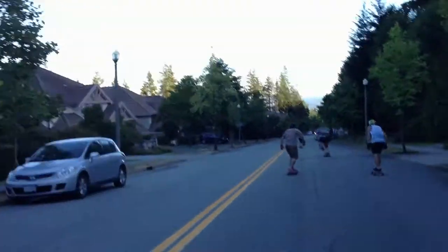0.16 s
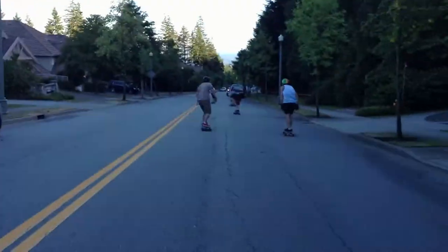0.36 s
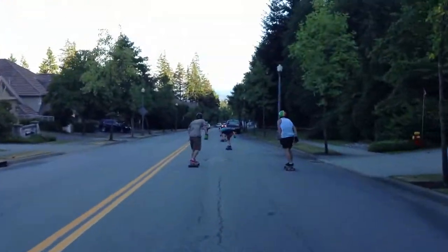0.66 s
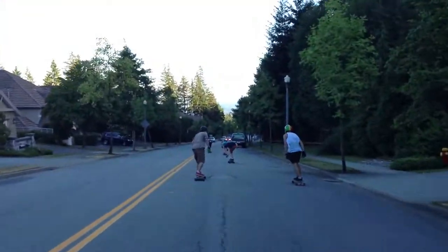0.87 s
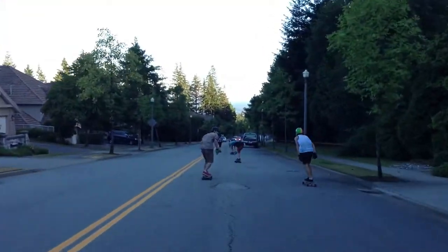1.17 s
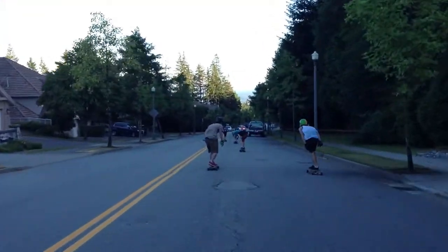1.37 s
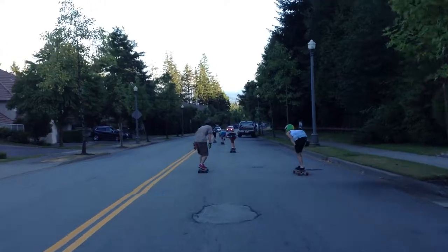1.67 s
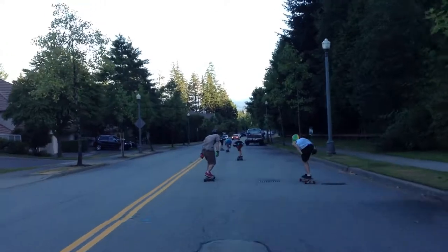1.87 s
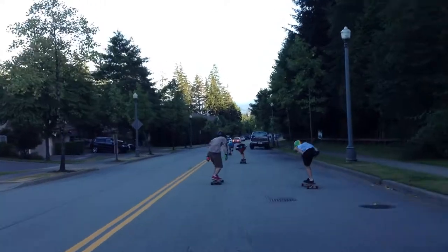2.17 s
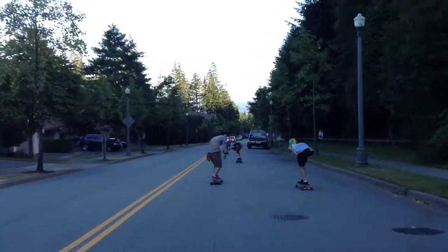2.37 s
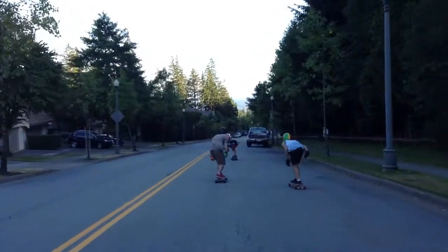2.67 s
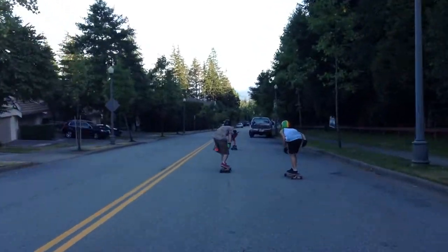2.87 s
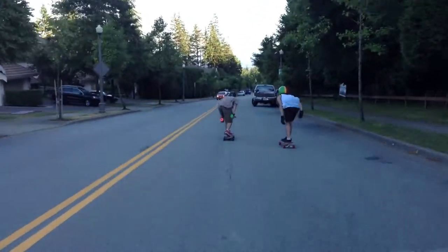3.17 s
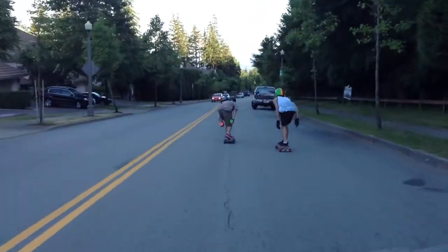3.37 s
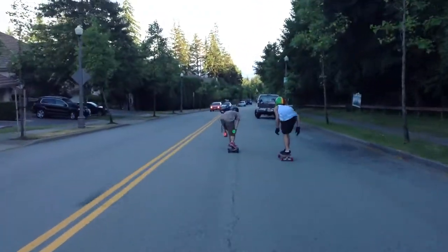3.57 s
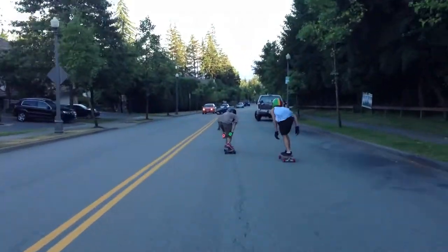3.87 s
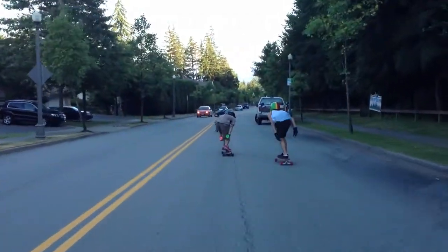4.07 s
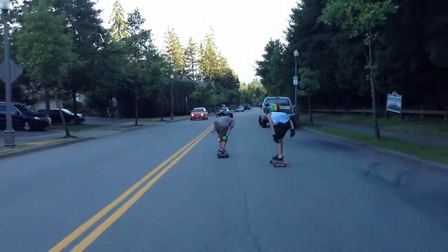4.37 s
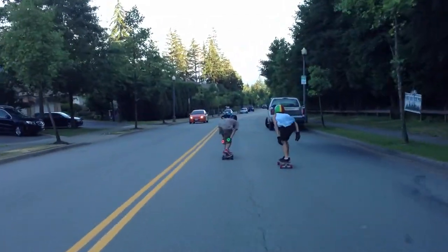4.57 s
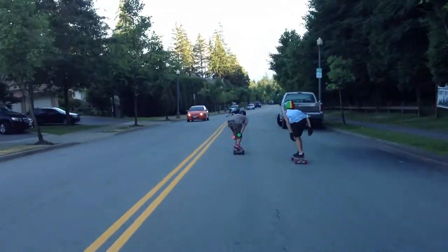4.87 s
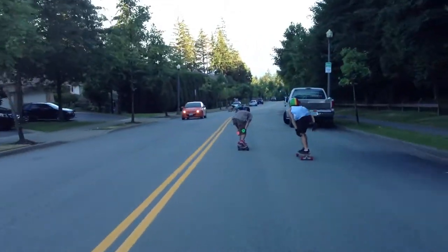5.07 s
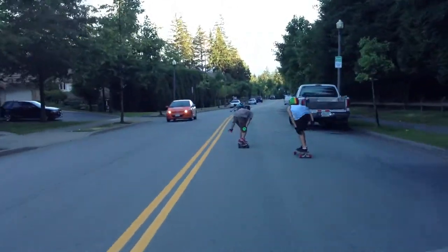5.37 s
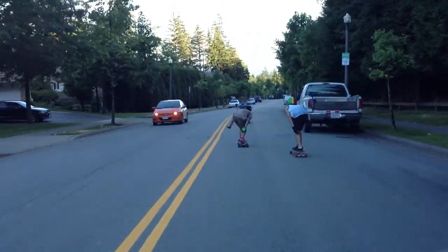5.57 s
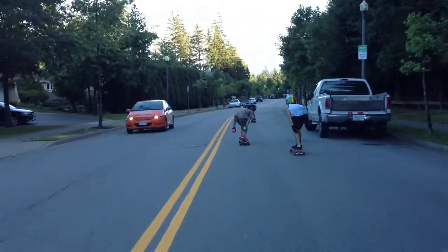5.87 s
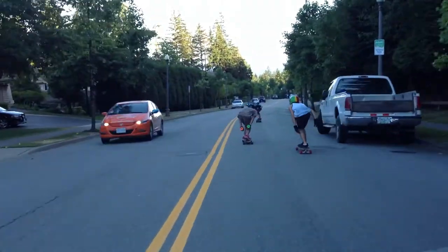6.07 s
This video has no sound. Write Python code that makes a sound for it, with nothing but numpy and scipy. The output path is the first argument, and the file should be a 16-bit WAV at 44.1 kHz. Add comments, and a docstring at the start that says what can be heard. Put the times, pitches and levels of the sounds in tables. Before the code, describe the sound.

Close, gusting wind whistles right at the microphone, its pitch warbling up and down over a low rumble and irregular thumps. The squeal is strongest in the first half, then turns into a ragged, fluttering rush with scraps of whistle. Behind it, longboards rolling down a street make a faint, even hiss on the asphalt, with a single brief wheel squeak near the start.

```python
"""Wind squealing on an edge right beside the microphone, held out in the airstream by a rider
following longboarders fast down a residential hill. The shed vortices sing with a wavering pitch
that rises in gusts, sags in lulls and breaks into a ragged rush in turbulence; eddies thump on the
capsule. Farther off, urethane wheels hiss on the asphalt and squeak once.
Mono, with the bass cut and a limiter holding the peaks down."""
import sys
import numpy as np
from scipy import signal
from scipy.fft import rfft, irfft
from scipy.io import wavfile
from scipy.ndimage import uniform_filter1d, minimum_filter1d

SR = 44100
rng = np.random.default_rng(int(sys.argv[2]) if len(sys.argv) > 2 else 0)


def inscribe(sig):
    """Save sig as 16-bit PCM at rate SR to the path in sys.argv[1].

    A 1-D sig is mono; a 2-D sig holds one channel per row.
    Samples are clipped to [-1, 1] before scaling.
    """
    pcm = np.round(np.clip(np.atleast_2d(sig).T, -1, 1) * 32767)
    wavfile.write(sys.argv[1], SR, pcm.astype(np.int16))


N = 273852
TIME = np.arange(N) / SR


def undb(db):
    """Decibels to gain."""
    return 10 ** (np.asarray(db) / 20)


def unit(x):
    """Scale to rms 1."""
    return x / np.sqrt(np.mean(x ** 2))


def curves(table):
    """Each column of a table, joined by straight lines in time."""
    times, *columns = np.transpose(table)
    return [np.interp(TIME, times, column) for column in columns]


def swells(table, skew=0):
    """Bell curves from rows of t/s, half length/s, height/dB, summed in dB; skew shortens their ends."""
    total_db = 0
    for t, half, db in table:
        width = half * (1 - skew * np.sign(TIME - t))
        total_db += db * np.exp(-np.minimum(((TIME - t) / width) ** 2, 20))
    return total_db


def flutter(slow_hz, fast_hz):
    """Random wavering between two rates, rms 1."""
    f = np.maximum(np.arange(N // 2 + 1) * SR / N, 1e-3)
    band = 1 / np.sqrt((1 + (slow_hz / f) ** 4) * (1 + (f / fast_hz) ** 6))
    return unit(irfft(rfft(rng.standard_normal(N)) * band, N))


def churn(spectrum, bursts, depth_db):
    """Noise that swells with the bursts, coloured by rows of f/Hz, level/dB; rms 1."""
    noise = rng.standard_normal(N) * undb(depth_db * bursts)
    hz, db = np.transpose(spectrum)
    f = np.maximum(np.arange(N // 2 + 1) * SR / N, 1)
    colour = undb(np.interp(np.log(f), np.log(hz), db))
    return unit(irfft(rfft(noise) * colour, N))


def voice(hz, unrest, bright_db):
    """A tone whose harmonics each sway in strength, tilted by bright_db per octave."""
    # harmonics, from the fundamental up: level/dB
    harmonics = [1.5, -7, -16, -25, -31.5, -38]
    phase = 2 * np.pi * np.cumsum(hz) / SR
    tone = 0
    for k, db in enumerate(harmonics, 1):
        sway_db = min(k, 3) * 1.37 * unrest * flutter(35, 201)
        gain = undb(db + sway_db + np.log2(k) * bright_db)
        tone += gain * np.sin(k * phase + rng.uniform(0, 2 * np.pi))
    return np.sqrt(2) * tone


def wheels():
    """Down the road, urethane wheels run over the fine grain of the asphalt: an even hiss."""
    # rolling noise: t/s, level/dB
    rolling = [(0, -39.5), (.65, -39.5), (1.2, -43.5), (3.9, -47), (4.5, -39.5), (5.35, -36), (5.7, -39),
               (6.21, -37.5)]
    # its spectrum: f/Hz, relative level/dB
    spectrum = [(100, 14), (700, 33.5), (1500, 27), (2500, 8), (3700, 14), (4400, 5), (7000, 7),
                (10000, -5), (12000, -5), (15500, -13.5)]
    level_db, = curves(rolling)
    return churn(spectrum, flutter(5, 40), depth_db=1.0) * undb(level_db)


def squeak():
    """Urethane sticks and slips on the asphalt in one short, raspy squeak."""
    # a wheel breaks its grip: t/s, f/Hz, level/dB
    skid = [(.55, 1900, -66), (.572, 2110, -37.5), (.6, 2000, -52), (.636, 1970, -22.5),
            (.652, 2105, -19.5), (.668, 2240, -48)]
    hz, db = curves(skid)
    sounding = (TIME > skid[0][0]) & (TIME < skid[-1][0])
    rasp = .08 * flutter(80, 700)
    return voice(hz * np.exp(rasp), unrest=.8, bright_db=-4.1) * undb(db) * sounding


def ticks():
    """Tiny sharp ticks in the thick of the squeal."""
    # impulses: t/s, level before the high-pass/dB
    impulses = [(1.1937, -37), (1.461, -38), (2.085, -29), (2.4929, -31), (2.7713, -32)]
    clicks = np.zeros(N)
    for t, db in impulses:
        clicks[int(t * SR)] = undb(db)
    return signal.sosfilt(signal.butter(1, 3000, "high", fs=SR, output="sos"), clicks)


def slaps(rise_s, fall_s):
    """Strong eddies hit the microphone: envelopes of thump and rush, and the stall before each in dB."""
    # eddies landing: t/s, thump level/dB, rush level/dB
    landings = [(0.052, -5, -26.5), (0.338, -13, -27), (0.48, -6, -15.5), (0.602, -21, -15.5),
                (0.679, -6.5, -13), (0.813, -15, -24), (.947, -16, -18.5), (1.011, -7.5, -21.5),
                (1.195, -14, -13.5), (1.475, -9, -7), (1.565, -16, -6), (1.965, -8, -31), (1.983, -22, -6),
                (2.259, -17, -13.5), (2.422, -24, -13), (2.75, -20, -10.5), (2.825, -20, -16),
                (2.987, -17.5, -29.5), (3.04, -13, -16.5), (3.141, -12, -10), (3.213, -19, -17.5),
                (3.46, -13, -23), (3.908, -11, -20), (4.002, -13, -17.5), (4.075, -10, -36),
                (4.253, -15, -20), (4.699, -16, -15.5), (4.772, -17, -20), (5.166, -31, -19.5),
                (5.289, -30, -17), (5.436, -11, -21), (5.557, -15, -17.5), (5.886, -13.5, -27),
                (5.987, -10, -29)]
    envelopes = np.zeros((2, N))
    for t, *levels_db in landings:
        near = slice(max(int((t - .1) * SR), 0), int((t + .1) * SR))
        age = TIME[near] - t
        width = np.where(age < 0, rise_s, fall_s)
        envelopes[:, near] += undb(levels_db)[:, None] * np.exp(-(age / width) ** 2)
    thump_hit, rush_hit = envelopes
    # the harder the rush, the deeper the air stalls just ahead of it
    lead_s, half_s, deepest_db = .013, .0038, 11.5
    hardest_db = max(db for _, _, db in landings)
    stalls = [(t - lead_s, half_s, deepest_db * undb(db - hardest_db)) for t, _, db in landings]
    return thump_hit, rush_hit, swells(stalls)


def buffeting(eddies, smooth_db, thump_hit):
    """Eddies press right on the capsule: a low rumble that eases in smooth air, and single thumps."""
    # rumble: t/s, relative level/dB
    rumble = [(0, -21.5), (.65, -16.5), (1.3, -22.5), (2.3, -23.5), (2.65, -24), (2.85, -19.5), (4.3, -23),
              (4.55, -20), (6.21, -21)]
    # its spectrum: f/Hz, relative level/dB
    spectrum = [(20, -32), (45, -32), (80, -15.5), (120, -3), (160, 3), (240, 4.5), (350, 1), (480, -3),
                (700, -22.5), (3000, -67.5)]
    rumble_db = curves(rumble)[0] + 1 - smooth_db + flutter(5.1, 9.8)
    return churn(spectrum, eddies, depth_db=3) * np.hypot(undb(rumble_db), thump_hit)


def tearing_hiss(swirl):
    """The finest eddies tear the hiss of the air into a crackle."""
    # tearing air: f/Hz, relative level/dB
    spectrum = [(900, -21), (1700, 10), (2500, 6.5), (3200, -2.5), (4500, -12), (6500, -18), (8500, -27.5),
                (11000, -48.5), (15000, -52)]
    fine_eddies = np.tanh(.44 * swirl + 3.9 * flutter(100, 600))
    return churn(spectrum, fine_eddies, depth_db=7.5)


def ragged_rush(swirl):
    """Broken flow past the edge: midrange noise in bursts with the passing eddies."""
    # turbulent pressure: f/Hz, relative level/dB
    spectrum = [(150, -29.5), (350, 1), (520, 4.5), (750, 3), (950, 1.5), (1220, -4.5), (1600, -4),
                (2100, -22), (3000, -34), (6000, -63.5)]
    return churn(spectrum, swirl, depth_db=1.5)


def hoots(arch):
    """The flow locks onto the edge for a moment: pitch and level rise and fall together."""
    # hoots at their crests: t/s, f/Hz, half length/s, level/dB
    crests = [(0.706, 955, .014, -13.5), (0.735, 792, .011, -17.5), (0.859, 747, 0.0064, -19),
              (2.852, 780, 0.012, -16.5), (2.95, 1070, .016, -22.5), (3.01, 1147, .009, -20),
              (3.472, 619.9, .006, -16), (3.885, 649, .006, -20), (4.43, 620, 0.014, -23),
              (4.528, 741, 0.011, -15.5), (4.779, 669.5, 0.0088, -21), (4.843, 570.8, .016, -15),
              (4.952, 623.3, .008, -15), (5.527, 789.6, 0.0057, -34), (6.01, 678.6, 0.0076, -27),
              (6.135, 826, .012, -23.5)]
    t, top_hz, half, db = np.transpose(crests)
    nearest = np.abs(TIME[:, None] - t).argmin(axis=1)
    away = np.minimum(((TIME - t[nearest]) / half[nearest]) ** 2, 20)
    hz = top_hz[nearest] * np.exp(-arch * away + .04175 * flutter(60, 410))
    return voice(hz, unrest=.56, bright_db=-1.6) * undb(db[nearest]) * np.exp(-away)


def squeal(hz, turbulence, surge, eddies, bright_db):
    """Vortices leave the edge nearly periodically; surges warble their rate, big eddies stall it."""
    unrest = np.sqrt(turbulence)
    jitter = .18 * turbulence ** .85 * flutter(70, 450)
    warble = (.03 + .095 * unrest) * surge + jitter
    stall = .55 * unrest * np.maximum(eddies - .7, 0) ** 2
    hz = hz * np.exp(warble - stall)
    # faster air sheds sharper vortices, so the overtones grow with each surge
    tone = voice(hz, unrest, bright_db + 4 * np.tanh(.5 * (warble - stall)))
    # neighbouring vortices merge unevenly into a rough growl about an octave lower
    merged_hz = hz * .44 * np.exp(.27 * flutter(32, 215.3))
    growl = np.sin(2 * np.pi * np.cumsum(merged_hz) / SR) * undb(-5 + .89 * eddies) * (1 - turbulence)
    return (tone + growl) * undb(unrest * (8.26 * eddies + surge))


def wind():
    """At the microphone, one stream of gusts and eddies drives squeal, rush, hiss and thumps together."""
    # airstream between gusts: t/s, relative level of squeal and rush/dB, of hiss/dB
    airstream = [(0, -33.5, -55.5), (.42, -33, -54.5), (.55, -24.5, -36), (.91, -29, -45),
                 (.98, -14.5, -34.5), (1.5, -16, -39.5), (1.62, -12, -31.5), (1.86, -15, -34.5),
                 (2.2, -16, -36), (2.5, -14, -34.5), (2.87, -15.5, -35.5), (2.93, -22, -35),
                 (3.55, -20, -40), (3.9, -24.5, -40.5), (4.32, -20.5, -39), (4.42, -19.5, -46),
                 (4.88, -17.5, -43), (5.3, -22, -48), (6.21, -20.5, -46)]
    # vortex shedding rate between gusts, following the air speed: t/s, f/Hz
    shedding = [(0, 740), (.93, 670), (1.18, 690), (1.26, 745), (1.57, 735), (1.68, 860), (1.86, 880),
                (2.14, 840), (2.25, 780), (2.34, 840), (2.76, 715), (2.88, 760), (2.96, 1030), (3.5, 810),
                (4.3, 850), (4.45, 730), (4.95, 820), (6.21, 710)]
    # how broken the flow is: t/s, turbulence/0-1
    roughness = [(0, 0.91), (.64, 0.65), (.97, 0.25), (1.1, 0.15), (2.55, .18), (2.87, 0.47), (3.02, .8),
                 (4.2, 0.78), (4.42, .5), (6.21, 0.47)]
    # gusts of briefly faster air: t/s, half length/s, strength/dB
    gusts = [(.319, .02, 6), (.484, .022, 10.5), (.683, 0.038, 11), (.78, .018, 8), (1.032, 0.022, 5.5),
             (1.279, 0.025, 7), (1.376, 0.023, 6), (1.663, 0.026, 6), (1.761, 0.016, 6), (1.9, 0.011, 4.5),
             (1.989, 0.015, 6), (2.089, .027, 6.5), (2.301, .025, 7.5), (2.425, 0.027, 6.5),
             (2.487, 0.024, 4), (2.591, 0.02, 6), (2.681, 0.011, 7.5), (2.809, .017, 3), (3.043, .009, 4),
             (3.146, 0.014, 5), (3.51, 0.019, 3), (3.611, 0.0095, 8), (3.795, 0.019, 3.5), (3.843, .012, 5),
             (3.915, 0.01206, 4), (3.982, .005, 6), (4.148, 0.0131, 4), (4.262, 0.016, 7),
             (4.537, 0.033, 5), (4.91, 0.017, 5), (5.05, .018, 6.5), (5.569, 0.015, 5), (5.703, .024, 7.5),
             (5.825, 0.019, 5), (5.908, .022, 6), (5.994, 0.013, 5.5), (6.076, .02, 7.5),
             (6.178, 0.025, 7.5)]
    # the eddies die away and the edge sings cleanly: t/s, half length/s, depth/dB
    smooth_spells = [(.725, 0.018, 9), (1.09, 0.034, 9.5), (1.81, 0.031, 6), (2.21, 0.036, 7.5),
                     (2.39, 0.025, 7), (2.63, 0.023, 5.5), (5.025, .025, 7), (5.69, 0.015, 2.5),
                     (5.825, 0.021, 23), (6.105, .028, 15.5)]
    # the flow briefly lets go: t/s, half length/s, depth/dB
    lulls = [(.114, 0.031, 6), (.752, 0.0073, 4), (.841, .011, 8), (.91, 0.023, 4), (1.455, 0.0074, 4),
             (1.537, .014, 12), (1.746, 0.0067, 9), (2.21, 0.036, 3), (2.407, 0.01, 8.5), (2.65, .015, 3),
             (2.725, 0.015, 5), (2.918, .013, 9), (3.029, 0.0041, 14), (3.183, .012, 7), (3.247, 0.014, 13),
             (3.71, 0.014, 10), (3.872, 0.0087, 17), (3.958, 0.019, 11.5), (4.042, .011, 9), (4.19, .01, 7),
             (4.408, .011, 7), (4.686, 0.00494, 6), (4.985, 0.00824, 6), (5.153, 0.0075, 13.5),
             (5.258, 0.017, 14.5), (5.513, .012, 13), (5.63, .022, 3.5), (6.035, 0.01168, 6.5)]
    air_db, tear_db = curves(airstream)
    air_hz, = curves(shedding)
    turbulence, = curves(roughness)
    gust_db = swells(gusts) + turbulence * flutter(8, 22.1)  # small random gusts in broken flow
    smooth_db, lull_db = swells(smooth_spells), swells(lulls, skew=.2)
    thump_hit, rush_hit, stall_db = slaps(rise_s=.0074, fall_s=.021)

    # gusts make the flow louder, rougher and higher in pitch; lulls flatten it
    flow_db, hiss_db = air_db + .67 * gust_db, tear_db + gust_db
    turbulence = np.clip(turbulence * undb(.313 * gust_db - smooth_db), .01, .99)
    hz = air_hz * np.exp(.021 * gust_db - .015 * lull_db)
    surge = flutter(18, 50)
    eddies = 2 * np.tanh(flutter(30.72, 119.1) / 2)
    swirl = eddies + .5 * surge * np.sqrt(turbulence)
    slap_lift = np.hypot(1, rush_hit / undb(flow_db))
    flow = undb(flow_db) * slap_lift
    broken = .78 * turbulence ** 1.4  # crossfade from squeal to rush
    bright_db = .49 * np.clip(hiss_db - flow_db + 18.5, -10, 5)  # harder tearing, brighter squeal

    tone = squeal(hz, turbulence, surge, eddies, bright_db) * np.sqrt(1 - broken) * flow * undb(-3)
    rush = ragged_rush(swirl) * np.sqrt(broken) * flow * undb(2)
    hiss = tearing_hiss(swirl) * slap_lift ** .31 * turbulence ** .2 * undb(hiss_db + 3)
    thump = buffeting(eddies, smooth_db, thump_hit)
    dip_db = lull_db + stall_db
    return (tone + rush + hiss) * undb(-dip_db) + thump * undb(-.6 * dip_db) + hoots(arch=.063)


def scene():
    """One microphone: wind up close, the wheels behind it."""
    return (wind() + wheels() + squeak() + ticks())[None]


def limit(x, ceiling, hold_s):
    """Look-ahead limiter: the gain dips smoothly around every peak above the ceiling."""
    size = max(int(hold_s * SR), 3)
    gain = minimum_filter1d(ceiling / np.maximum(np.abs(x), ceiling), 2 * size)
    return x * uniform_filter1d(uniform_filter1d(gain, size), size)


def record(dry):
    """The recorder cuts the deep bass, limits the peaks and cuts the top."""
    low_cut_hz, top_hz = 65, 15250
    thinned = signal.sosfilt(signal.butter(2, low_cut_hz, "high", fs=SR, output="sos"), dry)
    held = limit(thinned, ceiling=.68, hold_s=.002)
    return signal.sosfilt(signal.ellip(10, .2, 70, top_hz, fs=SR, output="sos"), held)


dry = scene()
out = record(dry)
inscribe(out)
```